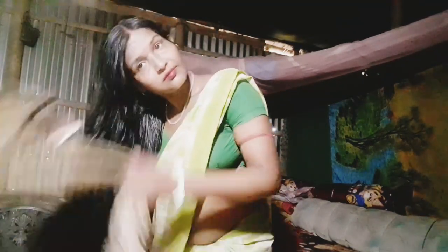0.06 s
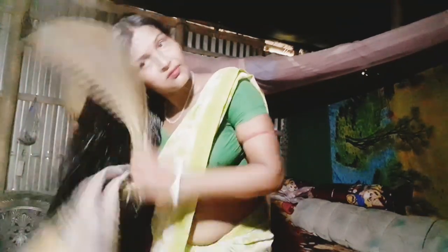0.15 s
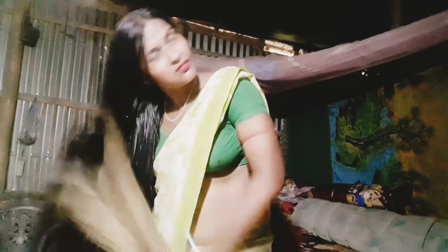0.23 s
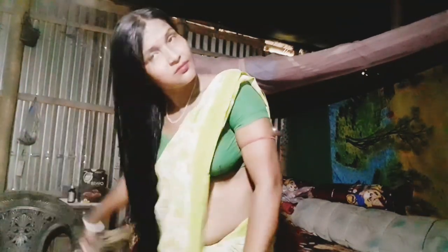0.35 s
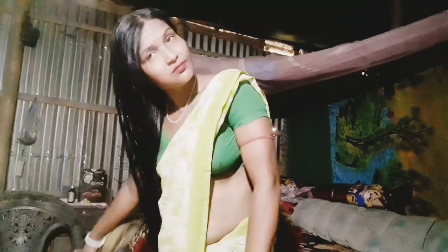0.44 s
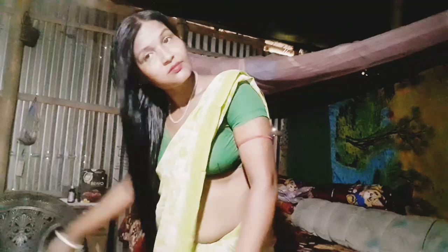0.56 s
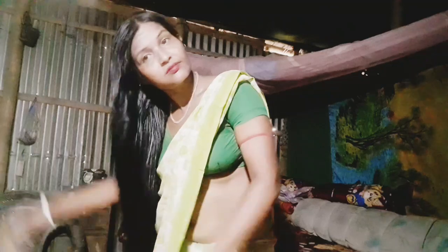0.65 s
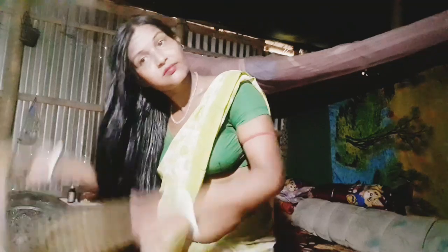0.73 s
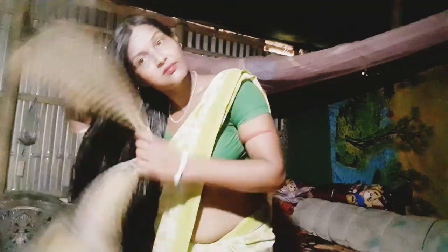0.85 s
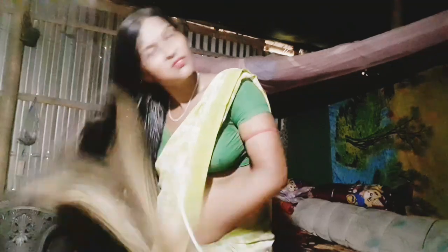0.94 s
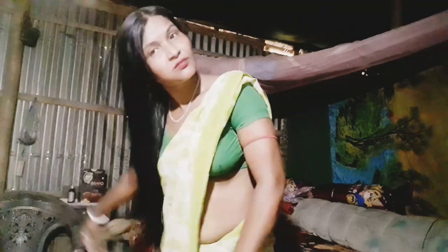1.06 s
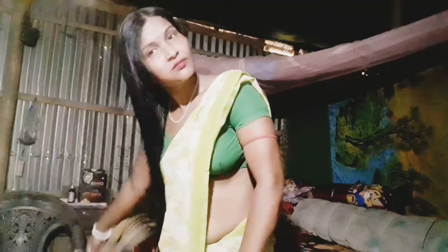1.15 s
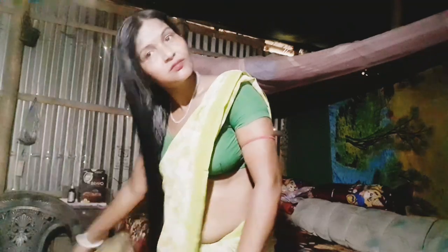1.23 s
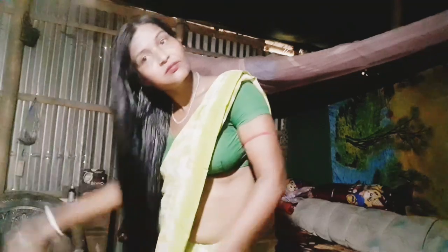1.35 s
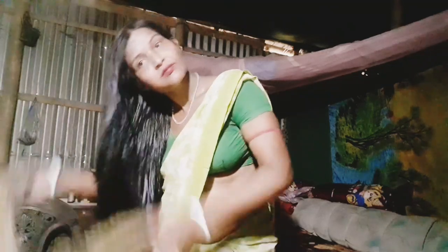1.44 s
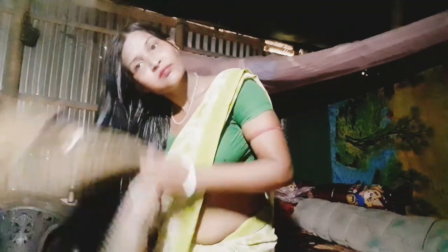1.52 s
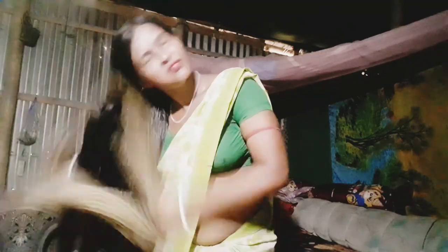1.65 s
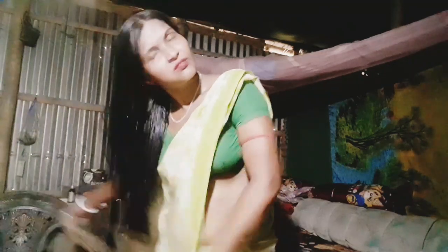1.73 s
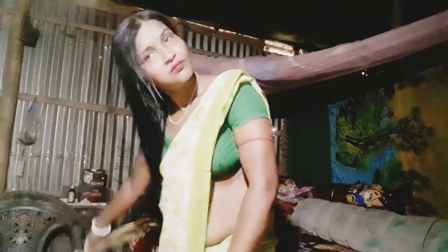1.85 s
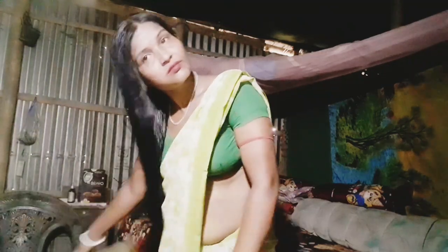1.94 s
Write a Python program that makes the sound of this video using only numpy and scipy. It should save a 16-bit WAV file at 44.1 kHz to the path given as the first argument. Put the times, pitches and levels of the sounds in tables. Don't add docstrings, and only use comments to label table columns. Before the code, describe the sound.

Long wet hair slapped with a bunched cloth in three sharp, spraying swishes over a low hum

```python
import sys
import numpy as np
from scipy import signal
from scipy.io import wavfile
from scipy.ndimage import uniform_filter1d

SR = 44100
rng = np.random.default_rng(int(sys.argv[2]) if len(sys.argv) > 2 else 0)


def level_to_linear(level):
    exponent = np.asarray(level, float) / 20
    return 10 ** exponent


def transcribe(signal):
    frames = np.atleast_2d(signal).T
    limited = np.clip(frames, -1, 1)
    pcm = np.round(limited * 32767).astype(np.int16)
    wavfile.write(sys.argv[1], SR, pcm)


N = 88200

# f/Hz, level/dB
SWISH_TONE = [(1200, -13.5), (2000, -15), (3500, -5.5), (6000, -4), (8000, -1.5), (11000, -18.5),
              (16000, -30.5)]
# f/Hz, level/dB
SPRAY_TONE = [(5000, -17), (8000, -14), (11000, -3), (14000, 1), (15700, 1.5), (17000, -5)]
# f/Hz, level/dB
CLOTH_TONE = [(60, -7), (150, -3), (500, -0.5), (1000, -1), (2200, -14), (4000, -24.5)]


def evened(x):
    return x / np.sqrt(np.mean(x ** 2) + 1e-20)


def read(points, hz):
    f, value = np.transpose(points)
    return np.interp(np.log(hz + 1), np.log(f + 1), value)


def colour(x, points, size=4096):
    hz = abs(np.fft.fftfreq(size, 1 / SR))
    log_gain = np.log(level_to_linear(read(points, hz)))
    phase = -signal.hilbert(log_gain).imag
    taps = np.fft.ifft(np.exp(log_gain + 1j * phase)).real[:size // 2]
    return signal.oaconvolve(x, taps)[:len(x)]


def closed(points):
    return [(points[0][0] / 4, points[0][1] - 30)] + list(points)


def resonate(x, hz, width_hz):
    carrier = np.exp(2j * np.pi * np.cumsum(hz * np.ones(len(x))) / SR)
    r = np.exp(-np.pi * width_hz / SR)
    return 2 * (carrier * signal.lfilter([1 - r], [1, -r], x / carrier)).real


def resonate_twice(x, hz, width_hz):
    return resonate(resonate(x, hz, width_hz), hz, width_hz)


def add(mix, start_s, sound):
    at = round(start_s * SR)
    sound = sound[max(-at, 0):]
    part = mix[max(at, 0):][:len(sound)]
    part += sound[:len(part)]


def air():
    # f/Hz, level/dB
    air_tone = [(1500, 3), (3000, -18), (5000, 9), (6500, 5), (10000, -2), (13000, 12), (16000, 8)]
    return level_to_linear(-67) * evened(colour(rng.standard_normal(N), closed(air_tone)))


def fan():
    # f/Hz, level/dB
    wash_tone = [(25, -17.5), (60, -11.5), (150, -9.5), (400, -11.5), (900, -13), (1500, -18.5),
                 (1800, -26), (2600, -35)]
    # f/Hz, width/Hz, level/dB
    fan_bands = [
        (92.6, 13, -70.5),
        (195.7, 60, -57.5),
        (345.6, 60, -64.5),
    ]
    # t/s, width/s, rise/dB
    surge_table = [(.01, 0.078, 8), (.9, 0.036, 6.5), (1.22, 0.032, 5.5), (1.5, 0.077, 8.5),
                   (1.84, 0.038, 10)]
    wash_db, waver_db = -54.5, 2.4
    t, lead = np.arange(N) / SR, SR // 10
    slow = uniform_filter1d(rng.standard_normal(N), size=2500)
    slow = evened(uniform_filter1d(slow, size=2500))
    wash = colour(rng.standard_normal(N + lead), closed(wash_tone))[lead:]
    out = level_to_linear(wash_db + waver_db * slow) * evened(wash)
    swell = level_to_linear(sum(db * np.exp(-((t - s) / width_s) ** 2) for s, width_s, db in surge_table))
    for hz, width_hz, db in fan_bands:
        band = resonate_twice(rng.standard_normal(N + lead), hz, width_hz)[lead:]
        out += level_to_linear(db) * swell * evened(band)
    return out


def insect():
    # t/s, length/s, level/dB
    rasp_table = [(-.2, 0.24, -64.5), (0.385, 0.26, -63.5), (0.644, 0.17, -57), (.86, 0.23, -56),
                  (1.073, 0.24, -58), (1.328, .21, -58), (1.855, 0.21, -60)]
    pulses_per_s, pulse_decay, steady = 103, .3, .28
    from_hz, to_hz, width_hz, fixed_band_db = 9850, 10250, 320, -6
    out = np.zeros(N)
    for start_s, length_s, db in rasp_table:
        t = np.arange(0, length_s, 1 / SR)
        u = t / length_s
        pulses = steady + np.exp(-(t * pulses_per_s % 1) / pulse_decay)
        scrape = pulses * rng.standard_normal(len(t))
        rising_hz = from_hz + (to_hz - from_hz) * np.sin(np.pi / 2 * np.minimum(u / .65, 1))
        wing = resonate_twice(scrape, rising_hz, width_hz)
        wing = wing + level_to_linear(fixed_band_db) * resonate_twice(scrape, from_hz, width_hz)
        swell = np.sin(np.pi * u ** 1.46) ** 0.72
        add(out, start_s, level_to_linear(db) * swell * evened(wing))
    return out


def room(x):
    # f/Hz, t60/s
    t60_table = [(300, 0.1), (2000, 0.15), (6000, 0.098), (14000, 0.1)]
    noise = np.r_[np.zeros(200), rng.standard_normal(SR // 2)]
    hz, t, z = signal.stft(noise, SR, nperseg=256)
    decay = level_to_linear(-60 * t / read(t60_table, hz)[:, None])
    tail = signal.istft(z * decay, SR, nperseg=256)[1]
    return signal.fftconvolve(x, tail / np.linalg.norm(tail))[:N]


def knocks():
    # t/s, level/dB, tick/dB, thump peak/dB
    knock_table = [(.103, -50, -18, -48), (.1452, -42, -2, -42), (.8662, -38, -4, -32),
                   (1.474, -45, -20, -44), (1.5866, -32, -5, -22)]
    # f/Hz, level/dB, t60/s
    mode_table = [(200, -3, .08), (330, 0, .09), (560, -2, .07), (900, -2, .06), (1300, -2, .06)]
    puff_db, puff_t60_s, tick_t60_s, thump_s = 0, .1, .035, .00026
    out, t = np.zeros(N), np.arange(6000) / SR
    for start_s, db, tick_db, thump_db in knock_table:
        ring = np.zeros(len(t))
        for hz, mode_db, t60_s in mode_table:
            mode_hz = hz * rng.uniform(.9, 1.1)
            ring += level_to_linear(mode_db - 60 * t / t60_s) * np.sin(2 * np.pi * mode_hz * t)
        puff = evened(colour(rng.standard_normal(6000), closed(CLOTH_TONE)))
        puff = puff * level_to_linear(puff_db - 60 * t / puff_t60_s)
        tick = evened(colour(rng.standard_normal(6000), closed(SWISH_TONE)))
        tick = tick * level_to_linear(tick_db - 60 * t / tick_t60_s)
        u = t / thump_s
        thump = 4 * u * (1 - u / 2) * np.exp(-u)
        add(out, start_s, level_to_linear(db) * (ring / abs(ring).max() + puff + tick) + level_to_linear(thump_db) * thump)
    return out


def snaps():
    # t/s, slap peak/dB, spray peak/dB
    snap_table = [(.1455, -40, -44), (.2408, -10, -16), (.2458, -20, -10), (.2472, -14, -11),
                  (.2519, -5, -10), (.274, -16, -22), (.306, -28, -20), (.9612, -17, -9), (.9658, -22, -17),
                  (.9685, -28, -17), (.8666, -33, -48), (1.5868, -29, -40), (.992, -22, -32),
                  (1.6155, -42, -34), (1.668, -26, -24), (1.6835, -21, -25), (1.685, -23, -28),
                  (1.698, -30, -21), (1.712, -28, -24)]
    decay_s = .0004
    out, t = np.zeros(N), np.arange(200) / SR
    for start_s, slap_db, spray_db in snap_table:
        burst = rng.standard_normal(200) * np.exp(-t / decay_s)
        for tone, db in (SWISH_TONE, slap_db), (SPRAY_TONE, spray_db):
            crack = colour(burst, closed(tone))
            add(out, start_s, level_to_linear(db) * crack / abs(crack).max())
    return out


def strands():
    slips_per_s, spread_db, hiss_share, gust_db = 4500, 3.5, .47, 2.0
    size = level_to_linear(spread_db * np.minimum(rng.exponential(1, N), 4))
    size = size * (rng.random(N) < slips_per_s / SR)
    gust = evened(uniform_filter1d(rng.standard_normal(N), size=150))
    slips = evened(size * rng.choice([-1, 1], N))
    drive = (1 - hiss_share) * slips + hiss_share * rng.standard_normal(N)
    return drive * level_to_linear(gust_db * gust)


def swings():
    # t/s, effort/dB, spray over effort/dB
    stroke_tables = [
        [(.115, -62.5, -16), (.146, -42.5, -14), (.17, -52.5, -2), (.225, -35.5, -7), (.237, -30, 4),
         (.2415, -19.5, 2), (.274, -22, -1), (.302, -37, 5), (.42, -65, -11)],
        [(.8655, -44, -18), (.898, -53.5, 1), (.94, -38, -8), (.953, -32.5, 0), (.961, -26.5, 7.5),
         (.972, -28, 2.5), (1.015, -34.5, 2.5), (1.06, -56.5, 2), (1.13, -72.5, -1)],
        [(1.586, -48, -12), (1.62, -47, -4), (1.66, -36, -4), (1.67, -30, 2.5), (1.685, -29.5, 3.5),
         (1.694, -35, 5), (1.714, -31, -2), (1.74, -40.5, 2.5), (1.83, -72, -5.5)],
    ]
    # t/s, length/s, level/dB, cloth over hair/dB
    rustle_table = [(-.05, 0.36, -80, 22), (0.101, 0.17, -77.5, 24.5), (0.788, 0.12, -62, 6.5),
                    (1.257, 0.6, -69.5, 8.5), (1.485, .11, -75.5, 19), (1.824, 0.42, -71, 13)]
    release_db_per_s = 143
    cloth_db, cloth_share, cloth_settle_s = -18.5, 0.83, 0.023
    t, swish, spray, cloth = np.arange(N) / SR, np.zeros(N), np.zeros(N), np.zeros(N)
    for stroke in stroke_tables:
        s, db, wet_db = np.transpose(stroke)
        effort_db = np.interp(t, s, db, -200) - release_db_per_s * np.maximum(t - s[-1], 0)
        swish += level_to_linear(effort_db)
        spray += level_to_linear(effort_db + np.interp(t, s, wet_db))
        cloth += level_to_linear(cloth_db + cloth_share * effort_db)
    lag = np.exp(-1 / (cloth_settle_s * SR))
    cloth = signal.lfilter([1 - lag], [1, -lag], cloth)
    for start_s, length_s, db, dull_db in rustle_table:
        u = np.clip((t - start_s) / length_s, 0, 1)
        shape = np.sin(np.pi * u ** 0.38)
        swish += level_to_linear(db) * shape
        cloth += level_to_linear(db + dull_db) * shape
    layers = (swish, SWISH_TONE), (spray, SPRAY_TONE), (cloth, CLOTH_TONE)
    return sum(gain * evened(colour(strands(), closed(tone))) for gain, tone in layers)


def scene():
    near = swings() + snaps() + knocks()
    room_db = -11
    return (near + level_to_linear(room_db) * room(near) + fan() + air() + insect())[None]


def top_cut(x):
    return signal.sosfilt(signal.butter(12, 16630, fs=SR, output="sos"), x)


def record(dry):
    # f/Hz, level/dB
    mic_tone = [(30, -9.5), (90, 1), (6500, -0.5), (7400, -9), (8400, -19.5), (9200, -10.5), (10500, -4.5),
                (12000, -6.5)]
    edge_hz = 15850
    low_pass = signal.firwin(511, edge_hz, window=("kaiser", 8), fs=SR)
    mix = signal.oaconvolve(colour(dry[0], mic_tone), low_pass, "same")[None]
    return top_cut(mix)


dry = scene()
out = record(dry)
transcribe(out)
```